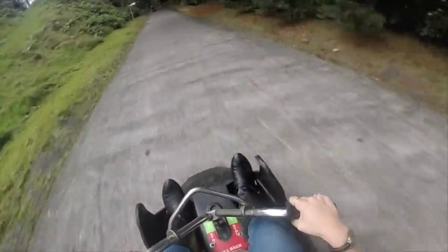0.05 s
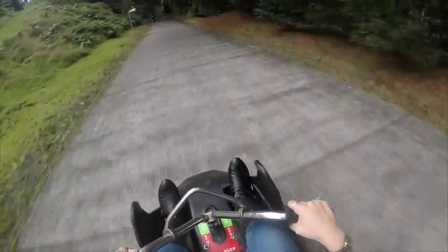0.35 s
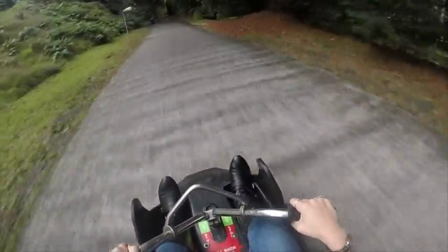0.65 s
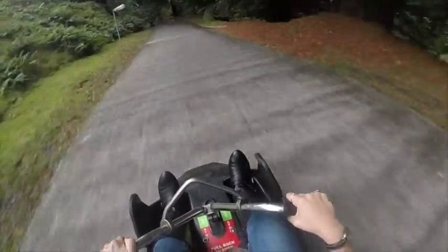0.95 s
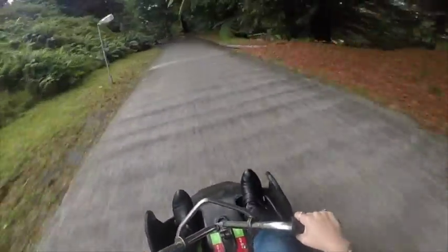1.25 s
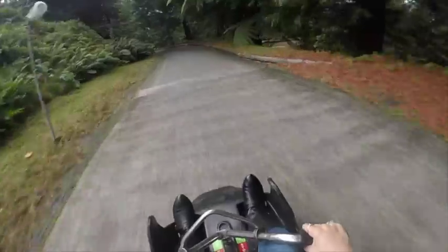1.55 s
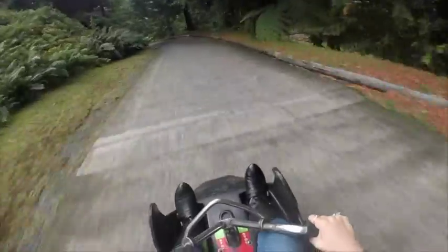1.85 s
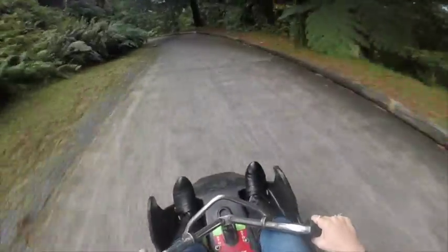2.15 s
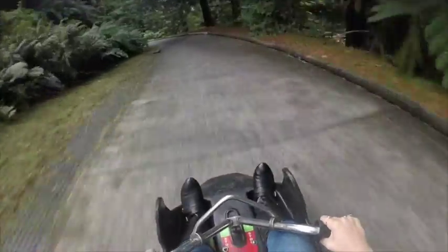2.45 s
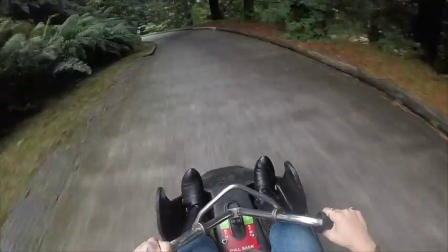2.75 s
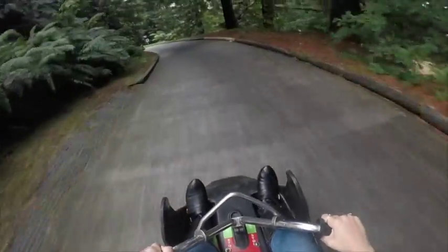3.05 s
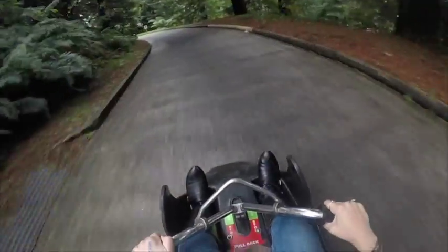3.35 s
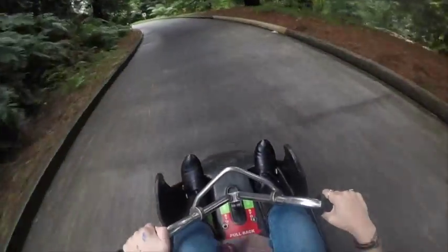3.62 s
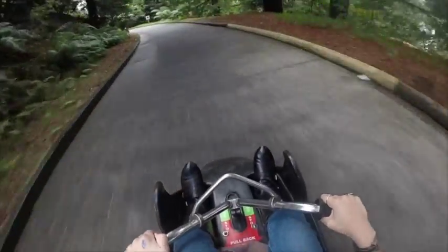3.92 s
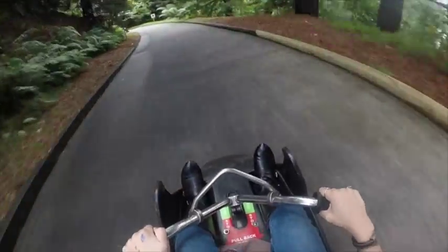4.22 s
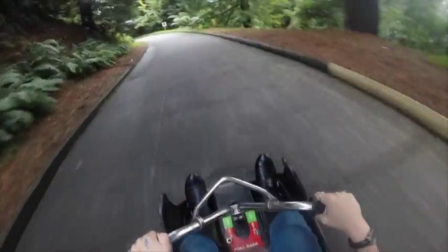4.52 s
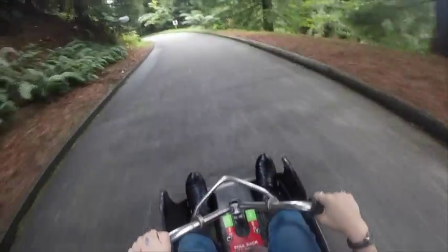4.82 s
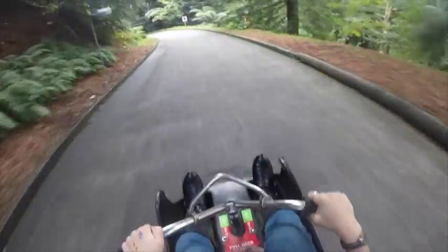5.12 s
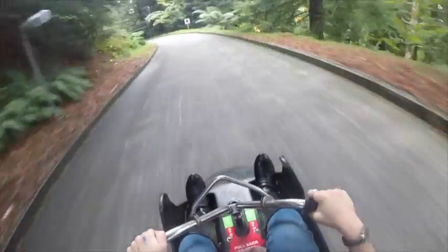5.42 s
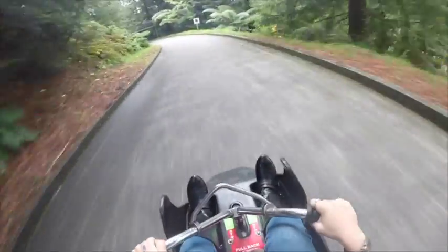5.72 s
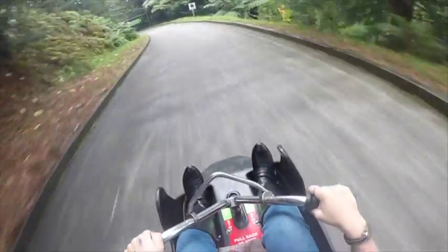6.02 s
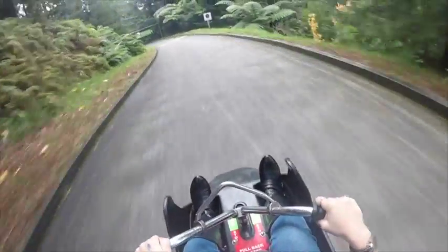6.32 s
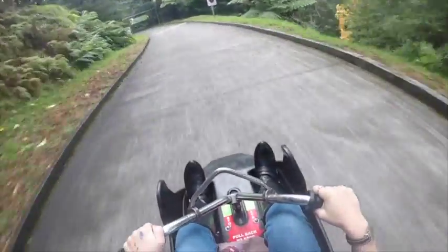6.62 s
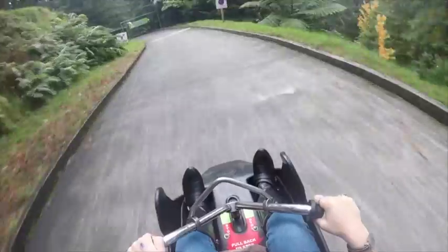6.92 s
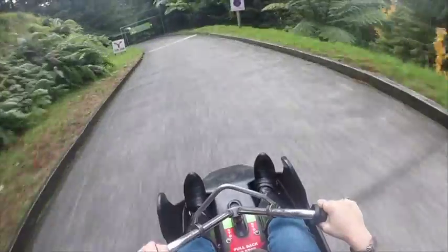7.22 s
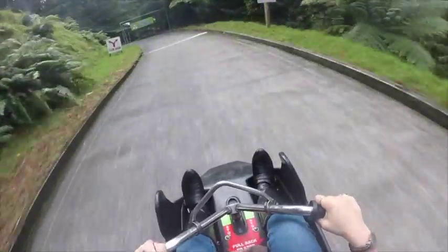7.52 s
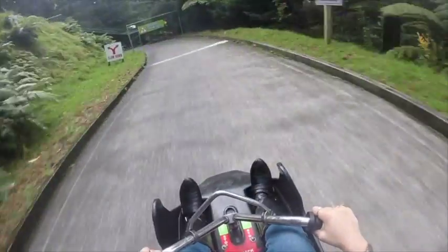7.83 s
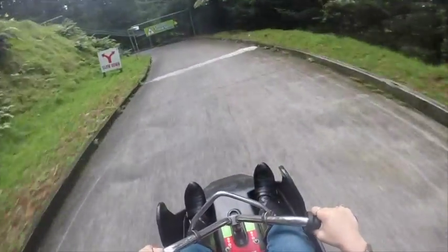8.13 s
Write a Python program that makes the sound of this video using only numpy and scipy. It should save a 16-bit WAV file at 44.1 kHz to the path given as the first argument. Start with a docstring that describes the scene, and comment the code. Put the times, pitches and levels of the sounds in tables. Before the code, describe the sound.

Hard wheels grind along a paved track as a coasting cart rumbles, thuds and rattles over bumps, then settles.

```python
"""A gravity cart coasting down a paved track

Hard wheels grind over grit, the plastic tub (the cart's body) drums, and the frame sways in the air.
On a rippled stretch the wheels thump and the loose steering column clacks; then the track smooths out.
It is all heard from a camera worn by the rider, whose case adds a hollow tone to the wheels and clacks."""
import sys
import numpy as np
from scipy import signal
from scipy.fft import rfft, irfft, next_fast_len
from scipy.io import wavfile
from scipy.ndimage import uniform_filter1d, map_coordinates

SR = 44100
rng = np.random.default_rng(int(sys.argv[2]) if len(sys.argv) > 2 else 0)


def int16_out(signal):
    """Quantize to a 16-bit WAV file."""
    q = np.round(np.clip(np.atleast_2d(signal).T, -1, 1) * 32767)
    wavfile.write(sys.argv[1], SR, q.astype(np.int16))


N = 364707


def wheels():
    """Grit strikes the hard treads: a grind that flutters with each turn, with a hollow whirr on top."""
    # how coarse the paving is, heard as wheel noise: (time [s], level [dB])
    paving = [(0.0, -42), (0.27, -42.5), (0.53, -41.5), (0.85, -43.5), (1.54, -38.5), (1.75, -39),
              (2.05, -39.5), (2.19, -41), (3.04, -45), (3.6, -47.5), (4.25, -47), (4.55, -48.5),
              (5.13, -45.5), (5.75, -45), (6.06, -47), (6.55, -46.5), (6.85, -49.5), (7.42, -48.5),
              (7.65, -50.5), (8.27, -49)]
    # tone of the grind, before the case: (frequency [Hz], level [dB])
    grind_tone = [(60, -0.5), (300, 9), (600, 0), (780, -4.5), (1050, 0), (1400, -2.5), (2300, 0),
                  (2650, 0.5), (3000, -8), (3600, -10), (4200, -16.5), (6000, -20.5), (8000, -31.5),
                  (10000, -35), (15000, -49)]
    # tone of the whirr, before the case: (frequency [Hz], level [dB])
    whirr_tone = [(1000, -56), (2600, -17), (2900, -1.5), (3300, -1), (3600, 1), (4000, -4.5), (4600, -25),
                  (9000, -57.5)]
    # the whirr swells and fades against the grind: (time [s], level [dB])
    whirr_swells = [(0, -1), (.15, -5.5), (.33, -5.5), (.58, -1.5), (.92, -5), (1.1, -2), (1.87, -2.5),
                    (2.35, -5), (2.8, -1.5), (3.15, -0.5), (3.47, -6), (3.62, -5.5), (3.8, -1), (3.98, -15),
                    (4.17, -2.5), (4.42, -7), (4.49, 2), (4.58, -12), (4.75, -7), (5.02, -3.5), (5.2, -6.5),
                    (5.62, -4), (5.87, -7.5), (6.1, -5), (6.45, -4), (6.75, -3.5), (6.88, -12), (7.0, -5),
                    (8.0, -6), (8.27, -17)]
    turns_per_s = 19.5
    turns = np.cumsum(turns_per_s * (1 + 0.043 * wobble(rate=1.48))) / SR
    flutter_db = 0.53 * np.sin(2 * np.pi * turns) + 0.85 * wobble(rate=35) + 0.34 * wobble(rate=8)
    grit = coloured(grains(rate=12000, spread_db=1.0), lambda hz: slope(grind_tone, hz) * case(hz))
    whirr = coloured(rng.standard_normal(N), lambda hz: slope(whirr_tone, hz) * case(hz))
    grinding = unit(patchy(grit, depth_db=1.0)) * amp(0.5)
    whirring = unit(patchy(whirr, depth_db=2.0)) * amp(curve(whirr_swells))
    return (grinding + whirring) * amp(curve(paving) + flutter_db)


def drumming():
    """The rough track shakes the axles and keeps the tub ringing."""
    # how uneven the track is, heard as drumming: (time [s], level [dB])
    unevenness = [(0.0, -40), (0.18, -39.5), (0.62, -36.5), (1.08, -37.5), (1.61, -36.5), (2.09, -38.5),
                  (2.3, -40), (2.8, -38), (3.1, -39.5), (3.6, -37.5), (4.3, -37.5), (4.6, -40),
                  (5.32, -40.5), (6.36, -40.5), (6.89, -40), (8.27, -39.5)]
    shaking = grains(rate=1800, spread_db=2.0) * amp(0.46 * wobble(rate=23) + 0.26 * wobble(rate=12))
    return unit(coloured(shaking, tub)) * amp(curve(unevenness) + 0.5)


def rumble():
    """The frame sways on its wheels in the gusty air."""
    # deep tone of the bouncing frame: (frequency [Hz], level [dB])
    bounce_tone = [(10, -23.5), (22, -8), (31, -0.5), (39, -2.5), (48, 1), (55, -2), (64, -16), (100, -23),
                   (200, -51), (600, -108)]
    # an uneven track makes it sway more: (time [s], level [dB])
    sway_levels = [(0.0, -38.5), (1.01, -30.5), (1.31, -35.5), (1.98, -32), (2.33, -37), (3.27, -39.5),
                   (5.13, -34.5), (7.44, -40), (7.56, -42), (8.27, -38.5)]
    sway = unit(coloured(rng.standard_normal(N), lambda hz: slope(bounce_tone, hz)))
    # the rider's weight holds back the widest swings
    swing_size = np.sqrt(np.abs(uniform_filter1d(sway ** 2, size=SR // 7)) + .05)
    return unit(sway / swing_size) * amp(curve(sway_levels) + 3.0 + 1.65 * wobble(rate=14))


def lurches():
    """Each dip in the track swings the whole frame back and forth two or three times."""
    # dips: (time of the widest swing [s], level [dB])
    dips = [(0.25, -23.5), (0.532, -19.5), (0.608, -21.5), (0.719, -22), (.85, -19.5), (.93, -22),
            (1.0, -21), (1.43, -20.5), (1.58, -15.5), (1.658, -14.5), (1.73, -13), (1.841, -19),
            (1.961, -20.5), (2.09, -16.5), (2.18, -17.5), (2.751, -20.5), (3.872, -28), (4.279, -25),
            (4.53, -25.5), (4.812, -22.5), (5.34, -20.5), (6.871, -21.5), (7.47, -21.5), (8.0, -24.5),
            (8.14, -26)]
    swing_hz, half_length_s = 37.8, 0.025
    out = np.zeros(N)
    t = np.arange(-SR // 8, SR // 8) / SR
    swell = np.exp(-(t / half_length_s) ** 2)
    for (s, db), (detune, phase) in zip(dips, rng.uniform(-1.18, 1, (len(dips), 2))):
        swing = np.sin(2 * np.pi * swing_hz * (1 + 0.16 * detune) * t + np.pi * phase)
        add(out, s + t[0], amp(db) * swell * swing)
    return out


def thumps():
    """Each bump gives a thud and sets the tub ringing; rounder bumps sound duller."""
    # ripples and seams under the wheels: (time [s], level [dB], brightness [Hz])
    bumps = [(.055, -26, 700), (.468, -19, 446), (0.535, -22, 620), (0.615, -20.5, 600), (1.099, -19, 610),
             (1.135, -19.5, 250), (1.3, -18.5, 596), (1.607, -13.5, 476), (1.662, -16.5, 900),
             (1.711, -10.5, 720), (1.727, -14, 380), (1.741, -31, 600), (1.926, -17, 746),
             (1.949, -12.5, 700), (1.957, -19, 282), (1.971, -24, 448), (2.034, -13, 232),
             (2.06, -20.5, 650), (2.096, -20, 500), (2.12, -23, 550), (2.411, -26, 650), (2.619, -21, 400),
             (2.7, -25, 650), (3.348, -25, 450), (3.797, -26.5, 700), (3.867, -33, 600), (4.107, -27, 400),
             (4.308, -28, 503), (4.727, -23.5, 600), (4.89, -22.5, 258), (5.243, -22, 750),
             (5.30, -29, 800), (5.392, -27.5, 900), (5.447, -25, 955), (5.494, -26, 650), (5.596, -31, 600),
             (5.732, -30, 280), (7.769, -32, 300)]
    # what a hard blow adds to the tub's ring: (frequency [Hz], level [dB])
    thud_tone = [(60, -17), (130, -9), (230, 3), (330, -11), (450, -2), (750, -5.5), (1100, -10.5),
                 (5000, -57)]
    out = np.zeros(N)
    for s, db, bright_hz in bumps:
        thud = blow(lambda hz: slope(thud_tone, hz) * low_pass(hz, bright_hz), scrape=0.099, fade_s=0.072)
        ring = blow(lambda hz: tub(hz) * low_pass(hz, bright_hz), scrape=0.13, fade_s=0.075)
        add(out, s, amp(db - 8.0) * thud + amp(db - 7.5) * ring)
    return out


def judders():
    """Small, uneven jolts shake the tub over broken paving; finer, harder patches sound higher."""
    # broken patches: (start [s], length [s], level [dB], middle frequency [Hz])
    patches = [(0.499, 0.14, -36.5, 228), (1.1, 0.064, -32, 169), (1.571, 0.21, -37, 273),
               (1.918, 0.066, -27, 216), (2.03, 0.16, -36, 262), (2.165, 0.066, -31, 220),
               (2.403, 0.029, -32, 228), (2.575, 0.074, -31.5, 178), (3.76, 0.22, -47, 517),
               (5.22, 0.11, -42.5, 480)]
    half_band_octaves = 0.7
    out = np.zeros(N)
    for start, length, db, centre_hz in patches:
        swell = np.sin(np.linspace(0, np.pi, round(length * SR)))
        jolts = grains(rate=1300, spread_db=4.5)[:len(swell)] * swell
        jolts = np.pad(jolts, (0, SR // 8))  # room to ring on
        band = lambda hz: 1 / (1 + (np.log2((hz + 1) / centre_hz) / half_band_octaves) ** 4)
        shake = coloured(jolts, lambda hz: tub(hz) * band(hz))
        strength = np.sqrt(np.sum(shake ** 2) / len(swell))
        add(out, start, amp(db) * shake / strength)
    return out


def steering_clacks():
    """The loose steering column strikes, bounces and strikes again; cushioned hits sound duller."""
    # hits of the column: (time [s], level [dB], brightness [Hz])
    hits = [(0.4807, -16, 15000), (.532, -23.5, 7000), (.624, -21.5, 14000), (0.949, -24, 12000),
            (1.061, -22, 7000), (1.099, -16, 15000), (1.152, -19, 13000), (1.298, -11.5, 16000),
            (1.5107, -15.5, 14000), (1.609, -13.5, 14000), (1.659, -18, 13000), (1.7383, -17.5, 14000),
            (1.954, -23.5, 3000), (2.063, -25, 4500), (2.624, -30, 5000), (4.727, -34, 5000),
            (4.849, -27, 3000), (5.274, -31, 4500), (5.447, -30, 4000)]
    # tone of a clack, before the case: (frequency [Hz], level [dB])
    clack_tone = [(150, -8), (450, 3), (1000, -8), (1900, 1), (3200, -5), (4500, -9), (7000, -21.5),
                  (9000, -33), (13500, -37), (15000, -47)]
    rebound_s, rebound_db = .003, -1.5
    out = np.zeros(N)
    for (s, db, bright_hz), scatter in zip(hits, rng.uniform(-1, 1, len(hits))):
        tone = lambda hz: slope(clack_tone, hz) * case(hz) * low_pass(hz, bright_hz)
        second_hit_s = s + rebound_s * (1 + 0.25 * scatter)
        for at, level_db in (s, db), (second_hit_s, db + rebound_db):
            add(out, at, amp(level_db - 4.0) * blow(tone, scrape=0.18, fade_s=0.018))
    return out


def shell_knocks():
    """The tub's hard shell meets the frame with a short, dry, woody knock."""
    # knocks: (time [s], peak level [dB])
    knocks = [(.4835, -30), (1.513, -37), (2.063, -29.5), (2.4086, -25.5), (4.259, -36), (4.727, -36.5),
              (5.274, -34), (5.301, -36), (5.393, -38), (5.447, -35), (5.498, -35.5), (5.737, -35)]
    # tone of a knock: (frequency [Hz], level [dB])
    knock_tone = [(300, -7.5), (850, 1), (1200, -4.5), (1850, 5), (2150, -2.5), (2600, -9), (4000, -17),
                  (9000, -52)]
    out = np.zeros(N)
    for s, db in knocks:
        add(out, s, amp(db) * blow(lambda hz: slope(knock_tone, hz), scrape=0.2, fade_s=0.044))
    return out


def flying_grit():
    """Pinched chips snap out from under the treads, and loose grit ticks against the tub at random."""
    # single chips: (time [s], peak level [dB])
    chips = [(.481, -46), (.8545, -46), (.9493, -56), (1.0605, -56), (1.099, -48), (1.299, -34),
             (1.3967, -43), (1.4711, -53), (1.959, -48), (2.0393, -47), (2.6235, -54), (4.0622, -55),
             (4.3186, -51), (4.7257, -48), (5.249, -49), (5.297, -47), (5.339, -55), (5.3897, -52),
             (5.4435, -47), (5.4909, -50), (5.736, -56)]
    # stretches of loose grit: (start [s], length [s], base level [dB])
    loose_grit = [(.8, 1.3, -61.5), (3.478, 0.1, -61), (3.998, 0.41, -63), (5.052, .45, -67)]
    # crisp tone of a tick: (frequency [Hz], level [dB])
    tick_tone = [(1000, -33), (3000, 8), (7500, 1), (9800, -3.5), (11000, -7), (12700, -6), (14000, -14),
                 (15000, -22)]
    flicks_per_s = 55
    tone = lambda hz: slope(tick_tone, hz)
    out = np.zeros(N)
    for s, db in chips:
        add(out, s, amp(db) * blow(tone, scrape=.6, fade_s=0.025))
    for start, length, db in loose_grit:
        for when, size in rng.random((int(flicks_per_s * length), 2)):
            tick = blow(tone, scrape=0.41, fade_s=0.0092)
            add(out, start + when * length, amp(db + 7.6 * (size + 0.5)) * tick)
    return out


def air():
    """Air passes over the case with a faint, even hiss."""
    # tone of the hiss: (frequency [Hz], level [dB])
    hiss_tone = [(300, -9), (1000, 9.5), (3000, -9), (6000, -8), (10000, -14), (12800, -18), (15000, -25)]
    return unit(coloured(rng.standard_normal(N), lambda hz: slope(hiss_tone, hz))) * amp(-64.5)


def tub(hz):
    """How strongly the tub rings at each frequency; it gives little bass and its plastic soaks up treble."""
    # the tub's natural notes: (frequency [Hz], width [Hz], level [dB])
    notes = [(139, 25, -9), (176.4, 21, 3), (217.7, 28, -4.5), (292, 44, -16), (374, 41, -13.5),
             (427, 34, -16.5), (448.5, 27.7, -7), (545, 28, -18), (605.4, 25, -14)]
    power = sum(amp(db) ** 2 * (hz * width) ** 2 / ((f * f - hz * hz) ** 2 + (hz * width) ** 2)
                for f, width, db in notes)
    return np.sqrt(power) * low_pass(hz, edge_hz=693) * (1 - low_pass(hz, edge_hz=73.5))


def case(hz):
    """The camera case boosts some frequencies and weakens others, which sounds hollow."""
    # its peaks and dips: (frequency [Hz], width [Hz], boost [dB])
    peaks = [(1040, 65, 0.5), (1713, 110, 3), (1872, 53, 4), (2254, 85, 2), (2406, 75, -3), (2490, 65, 2),
             (2610, 60, -5.5), (2910, 143, 7.5), (3072, 116, 12.5), (3275, 150, 10.5), (3455, 190, 8.5),
             (3767, 167, 7), (4460, 90, -0.5), (4603, 206, 6), (4770, 120, 3), (5640, 180, 4.5),
             (9700, 570, 2.5)]
    return 1 + sum((amp(db) - 1) * np.exp(-2 * ((hz - f) / width) ** 2) for f, width, db in peaks)


def blow(gain, scrape, fade_s):
    """One hit of peak 1, toned by what it strikes: a push, then a scrape that falls 60 dB in fade_s."""
    t = np.arange(SR // 6) / SR
    force = scrape * rng.standard_normal(len(t)) * amp(-60 * t / fade_s)
    force[0] += 1
    ring = coloured(force, gain)
    return ring / np.abs(ring).max()


def grains(rate, spread_db):
    """Tiny random impacts of uneven size, about `rate` a second."""
    struck = rng.random(N) < rate / SR
    return unit(struck * rng.standard_normal(N) * amp(spread_db * rng.standard_normal(N)))


def patchy(x, depth_db):
    """Let narrow frequency bands swell and fade on their own."""
    bands = signal.stft(x, nperseg=1024)[2]
    swells = uniform_filter1d(rng.standard_normal(bands.shape), size=5, axis=0)  # smooth over frequency
    swells = uniform_filter1d(swells, size=8, axis=1)  # and over time
    return signal.istft(bands * amp(depth_db * unit(swells)), nperseg=1024)[1][:N]


def coloured(x, gain):
    """Filter x by gain(hz) so that ringing comes after a hit, never before (minimum phase)."""
    size = 2 * next_fast_len(len(x) // 2 + 4096)
    cepstrum = irfft(np.log(gain(np.fft.rfftfreq(size, 1 / SR)) + 1e-6))
    cepstrum[1:size // 2] *= 2
    cepstrum[size // 2 + 1:] = 0
    return irfft(rfft(x, size) * np.exp(rfft(cepstrum)))[:len(x)]


def slope(points, hz):
    """Gain at hz, from (frequency, level) points joined on a pitch scale."""
    f, db = np.transpose(points)
    return amp(np.interp(np.log(hz + 1), np.log(f), db))


def low_pass(hz, edge_hz):
    """Gain that falls away above edge_hz."""
    return 1 / np.sqrt(1 + (hz / edge_hz) ** 8)


def curve(points):
    """Join (time, value) points into one value per sample."""
    return np.interp(np.arange(N) / SR, *np.transpose(points))


def wobble(rate):
    """A smooth curve through `rate` random points a second."""
    return map_coordinates(rng.standard_normal(int(N * rate / SR) + 4), [np.arange(N) * rate / SR])


def amp(db):
    """Turn decibels into a gain (a multiplier)."""
    return 10 ** (np.asarray(db) / 20)


def unit(x):
    """Scale to an average strength (rms) of 1."""
    return x / np.sqrt(np.mean(x ** 2) + 1e-20)


def add(track, s, sound):
    """Mix a sound in at s seconds."""
    part = track[round(s * SR):][:len(sound)]
    part += sound[:len(part)]


def scene():
    """Mix the rolling and the hits into one channel; everything rides along with the microphone."""
    rolling = rumble() + drumming() + wheels() + air()
    hits = lurches() + thumps() + judders() + steering_clacks() + shell_knocks() + flying_grit()
    return (rolling + hits)[None]


def record(dry):
    """The camera cuts off the highest treble."""
    top_hz = 15030
    size = next_fast_len(N + SR // 2)
    kept = np.fft.rfftfreq(size, 1 / SR) < top_hz
    return irfft(rfft(dry, size) * kept, size)[..., :N]


dry = scene()
out = record(dry)
int16_out(out)
```